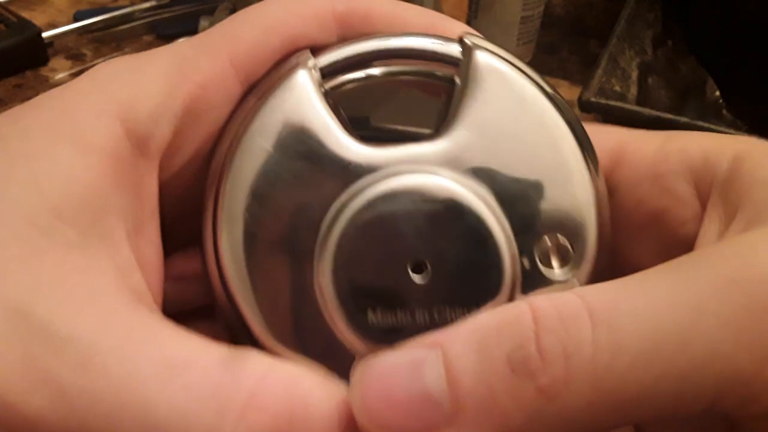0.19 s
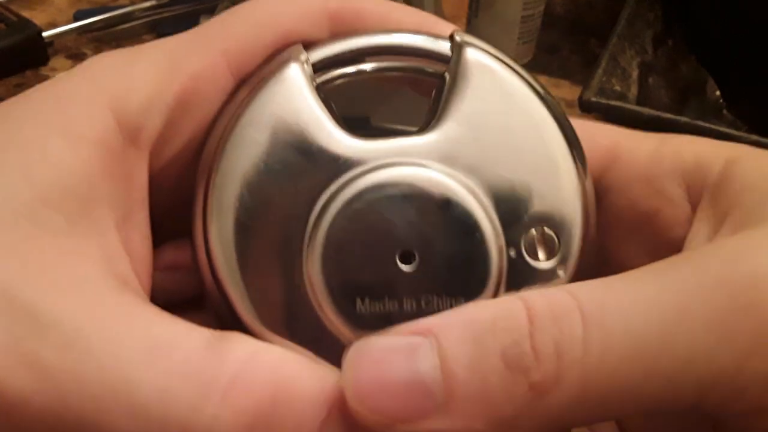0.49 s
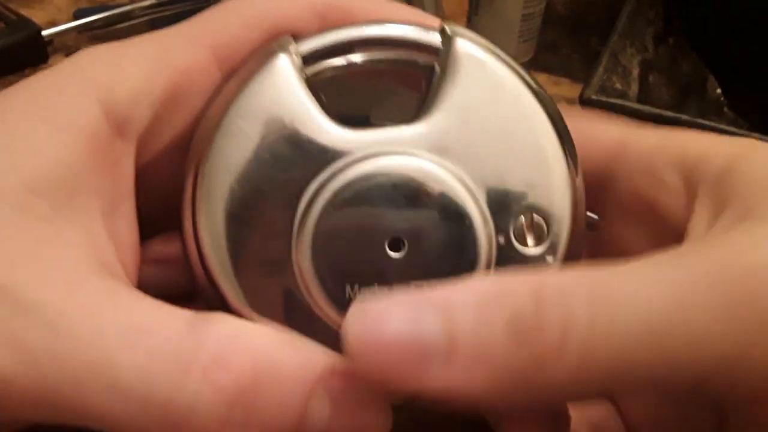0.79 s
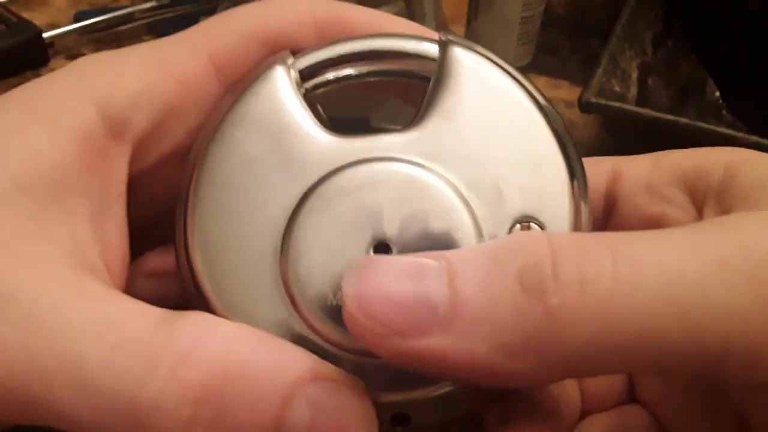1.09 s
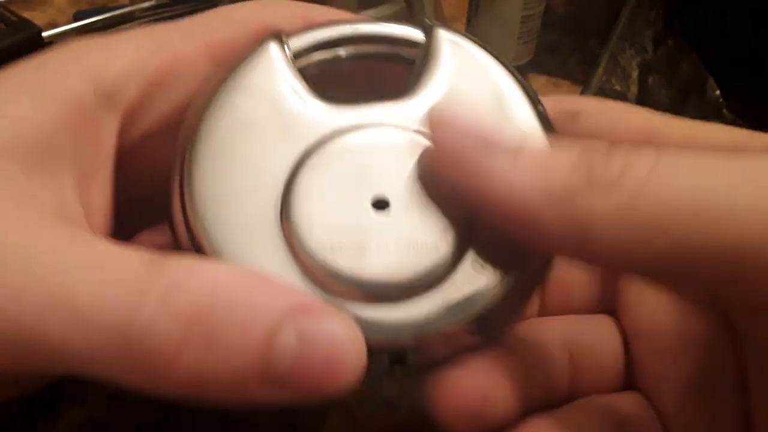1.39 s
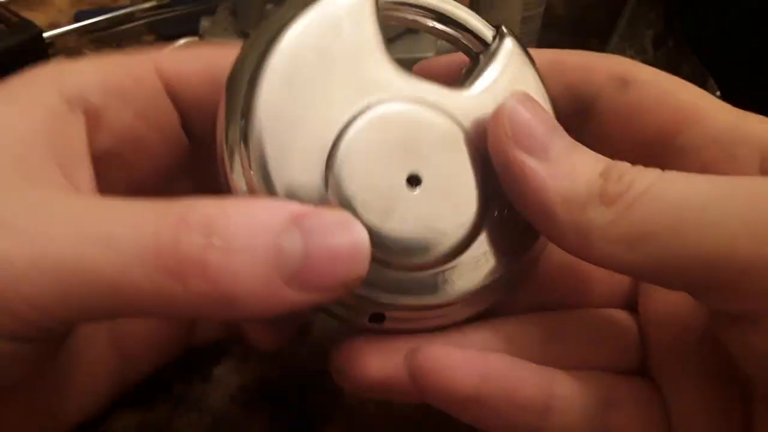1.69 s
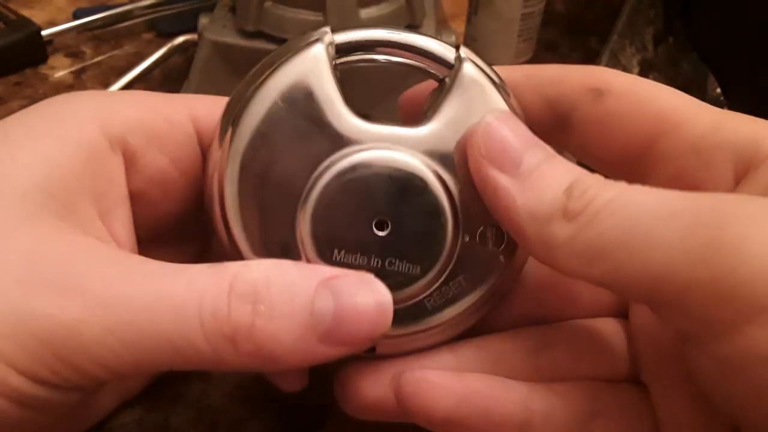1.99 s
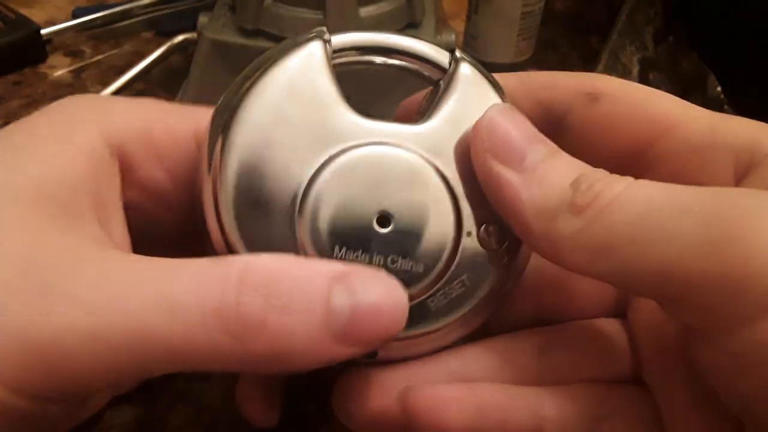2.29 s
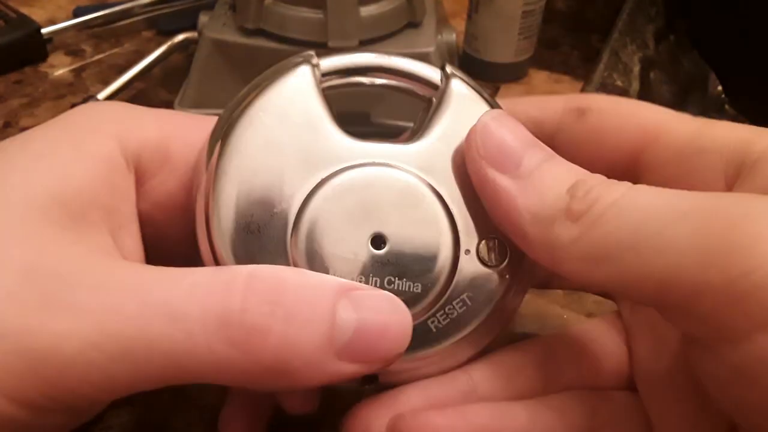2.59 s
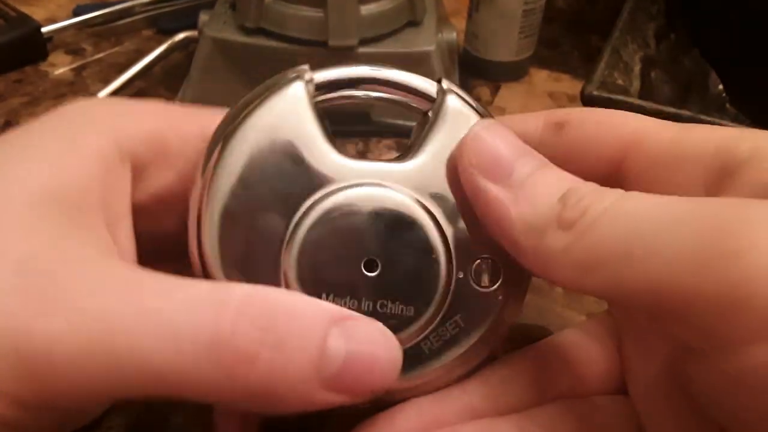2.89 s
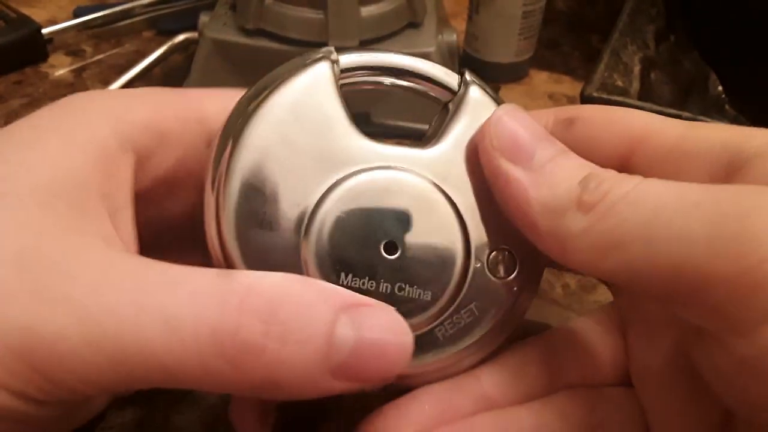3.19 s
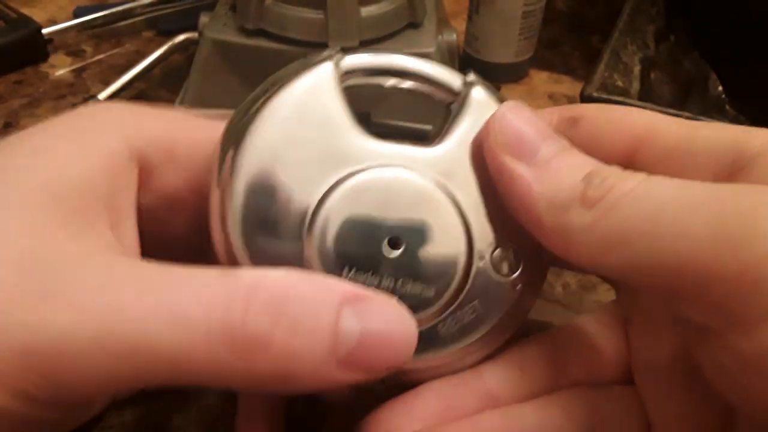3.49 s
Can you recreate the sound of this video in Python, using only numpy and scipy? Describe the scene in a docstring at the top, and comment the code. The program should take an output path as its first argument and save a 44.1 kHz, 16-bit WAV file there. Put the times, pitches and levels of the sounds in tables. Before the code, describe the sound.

Combination padlock dials clicking, very close: a quick uneven cluster of sharp metal ticks, a pause with one hard clack as the lock shifts, then denser, brighter clicking. Soft finger rubbing and faint hiss in a quiet room.

```python
"""Steel disc padlock in the hands.

Thumbs turn the small metal dials of a disc padlock, close to the microphone in a quiet room.
Clicks, scrapes and loose ticks are noise bursts and grains filtered by the hand-damped case; pings are
decaying sines, and the lock clacks once. Fingers slide, rub and bump: shaped noise. Hiss lies below.
The room answers the clicks, scrapes, ticks and clack with one bench reflection and a noise tail."""
import sys
import numpy as np
from scipy import signal
from scipy.fft import rfft, irfft
from scipy.io import wavfile

SR = 44100
rng = np.random.default_rng(int(sys.argv[2]) if len(sys.argv) > 2 else 0)


def pcm_store(signal):
    """Save signal as 16-bit PCM."""
    levels = np.round(np.clip(np.atleast_2d(signal), -1, 1) * 32767)
    wavfile.write(sys.argv[1], SR, levels.astype(np.int16).T)


N = 158760
HZ = np.fft.rfftfreq(4096, 1 / SR)
FFT_SIZE = 2 * (len(HZ) - 1)
REGRIP_S = 1.4  # clicks and scrapes use the second grip's case from here on
RISE_S = 0.000768  # onset of clicks, pings and clack

# Detent clicks: t/s, level before trim/dB, knock re level before trim/dB,
# bright edge re level before trim/dB, knock pitch/Hz, tick pitch/Hz
CLICKS = [(0.0662, -46.5, -5, -5, 1850, 4830), (0.094, -38.5, -12, 0, 2000, 6200),
          (0.1984, -40.5, -1.5, -16, 1830, 5830), (0.2098, -35.5, -19, -1.5, 2020, 4470),
          (0.2183, -53, 13, -10, 1900, 3340), (0.2504, -31, -16, -12, 1610, 6060),
          (0.2539, -30, -1, -9, 1790, 4970), (0.2563, -32.5, -34, -3.5, 1690, 5000),
          (0.2758, -31, -4, -27, 1790, 5050), (0.2796, -34.5, -0.5, -3, 1620, 6100),
          (0.4116, -33, -4, -11, 1880, 5900), (0.5253, -41, -4.5, -9, 1830, 6000),
          (0.5914, -39, -1.5, -12, 1770, 6000), (0.6175, -33, -20, 3, 1880, 6200),
          (0.6245, -25, -9, 4, 1140, 6150), (0.6292, -42, -24, 12, 1350, 5900),
          (0.6356, -31, -4, -11, 1780, 4500), (0.7008, -29.5, -6.5, -8.5, 1430, 6000),
          (0.7145, -53, 0, -10, 1780, 5940), (0.9519, -51, -4, -21, 1310, 3760),
          (0.9902, -45.5, -8, -19, 1770, 6100), (1.0034, -48, -14, -14, 1790, 4920),
          (1.0139, -29.5, -19.5, -2, 1500, 5960), (1.0252, -33, -11.5, -1.5, 2100, 6940),
          (1.0302, -36, -27, -10, 1750, 6000), (1.039, -35, -15, -5, 1170, 6400),
          (1.047, -38.5, -25, -2, 2040, 5260), (1.0594, -44, -13, -7, 2030, 5200),
          (1.193, -50, -10, -6, 2020, 5400), (1.215, -48.5, -25, -6.5, 2020, 5660),
          (1.5684, -53.5, -2.5, -14, 2020, 2760), (1.6328, -43, -4, -10, 1930, 3950),
          (1.9116, -44, -1, -11, 1840, 3600), (1.9153, -41.5, 4, -20, 2030, 3870),
          (1.9414, -51, 9.5, -6, 2020, 3340), (1.9517, -33, -6, -5.5, 1250, 6000),
          (1.9849, -45, -3, -7, 1270, 5300), (2.0512, -35, -11.5, -3.5, 1320, 5800),
          (2.106, -49, 7, -15, 1110, 5000), (2.118, -49, 0, 10, 1270, 6300),
          (2.1265, -36.5, -7, 6, 1280, 6700), (2.131, -33.5, -7, 3, 1180, 7060),
          (2.1366, -38, -5, 2, 1080, 6750), (2.1495, -34, -6.5, 1.5, 1310, 6500),
          (2.1532, -22, -8, -3.5, 1890, 6400), (2.2164, -33, -8.5, -9, 2200, 3600),
          (2.28, -37, -9.5, -27, 2110, 6200), (2.3007, -41, 3.5, -14, 2050, 4430),
          (2.3244, -48, 5, -20, 1050, 3820), (2.343, -35, 3.5, -11.5, 1290, 4120),
          (2.3502, -42, 9.5, -6.5, 1280, 3600), (2.424, -39, 0.5, -14, 1330, 4530),
          (2.4379, -47, 13.5, -13, 1780, 3560), (2.4443, -44, 2.5, -7, 1830, 4000),
          (2.5185, -31.5, -6, -1, 2250, 4270), (2.5245, -33, -5, 0.5, 1360, 6000),
          (2.5342, -28.5, -8.5, 5, 1290, 6500), (2.5415, -40, 4.5, -3, 980, 6160),
          (2.548, -42, -12, -5, 1200, 6200), (2.561, -39.5, -1.5, 1, 1100, 4400),
          (2.5748, -37.5, -6.5, -8, 2120, 3750), (2.5934, -44, -2, -16, 1300, 3720),
          (2.7036, -29, -10, -17.5, 1960, 6070), (2.7115, -38, -2, -13, 2050, 4530),
          (2.7571, -33.5, -6, -12, 2010, 4440), (2.886, -30, -16, -1, 2070, 4660),
          (2.91, -33.5, -1, 1.5, 1270, 6300), (2.934, -32, -14, -8, 1270, 4200),
          (2.9396, -36, -6, -4, 1290, 5400), (2.943, -33, -6, -3, 1290, 5600),
          (2.946, -26, -17, -1.5, 1290, 5300), (2.9653, -24, -6, -8.5, 1350, 5050),
          (3.1211, -35.5, 0, -15, 1940, 4400), (3.1437, -31.5, 5.5, -8.5, 1130, 4600),
          (3.1553, -27, -12, -4, 1870, 5400), (3.2318, -40.5, -10.5, -1, 2010, 4730),
          (3.2941, -37.5, -3.5, -7, 1260, 6740), (3.304, -41, -9, -8, 1340, 4600),
          (3.32, -42, 0, -4, 1140, 4700), (3.324, -33, -4.5, 6.5, 1140, 4430),
          (3.335, -34.5, 1, 2.5, 1820, 3920), (3.3372, -33.5, 0.5, 5.5, 1170, 3900),
          (3.4133, -50.5, 11, -11, 1260, 3040), (3.4437, -46.5, 2.5, -18, 990, 3160)]
# The two microphone ports: f/Hz, likeness/0-1, left lead/rad, left re right/dB
PORTS = [(100, 0.5, 0.093, 30), (790, 0.9, 0.46, -2.5), (1053, 1, 1.08, 0), (1385, 0.99, 1.83, 4.5),
         (1813, 0.97, 1.32, 2), (2090, 0.73, 2.8, -5.5), (2790, 0.47, 3.86, 2.5), (4330, 1, 4.32, -0.5),
         (5340, 0.02, 7.7, -0.5), (6480, 0.45, 7.73, 0), (7380, 0.98, 7.84, -3.5), (8930, 0, 5.4, 3),
         (12800, 0.34, 8.1, -3.5), (14500, 0.92, 1.85, -2)]


def amp(db):
    """Decibels to gain."""
    return 10 ** (np.asarray(db) / 20)


def unit(x):
    """Scales to rms 1."""
    return x / np.sqrt(np.mean(x ** 2) + 1e-20)


def read(table, hz, axis=1):
    """One column of a table, interpolated on a log-frequency axis."""
    table = np.array(table)
    return np.interp(np.log(hz + 1), np.log(table[:, 0]), table[:, axis])


def level(table):
    """Gain over the whole scene from rows of time and dB."""
    return amp(np.interp(np.arange(N) / SR, *np.transpose(table)))


def add(mix, s, sound):
    """Mixes a stereo sound in at time s."""
    part = mix[:, max(round(s * SR), 0):][:, :sound.shape[1]]
    part += sound[:, :part.shape[1]]


def causal(db):
    """Causal (minimum-phase) frequency response with this gain in dB."""
    log_gain = np.log(amp(db))
    mirrored = np.r_[log_gain, log_gain[-2:0:-1]]
    return np.exp(np.conj(signal.hilbert(mirrored)))[:len(HZ)]


def peak(hz, width):
    """Bell of height 1 around a resonance."""
    return 1 / (1 + (2 * (HZ - hz) / width) ** 2)


def ports(pair, size):
    """Spectra of two unrelated noises, made as alike as the two ports hear them."""
    hz = np.fft.rfftfreq(size, 1 / SR)
    a, b = rfft(pair, size)
    same = np.clip(read(PORTS, hz), 0, 1)
    side = amp(read(PORTS, hz, axis=3) / 2)
    lag = np.exp(-1j * read(PORTS, hz, axis=2))
    right = (same * a + np.sqrt(1 - same ** 2) * b) * lag
    return np.array([a * side, right / side])


def noise(colour):
    """Steady stereo noise of one colour at rms 1, partly alike at both ports in the bass."""
    hz = np.fft.rfftfreq(N, 1 / SR)
    a, b = rfft(rng.standard_normal((2, N)))
    same = np.clip(0.66 / (1 + (hz / 900) ** 2), 0, 1)
    right = same * a + np.sqrt(1 - same ** 2) * b
    return unit(irfft(np.array([a, right]) * amp(read(colour, hz)), N))


def slides():
    """Fingertip friction: noise in a narrow resonance that glides as the fingertip moves."""
    # start/s, length/s, from/Hz, to/Hz, level before fade window/dB
    slide_rows = [(-.02, 0.076, 309, 390, -62.5), (0, 0.087, 485, 582, -64.5),
                  (0.068, 0.078, 378, 414, -67.5), (0.357, .12, 184, 243, -66),
                  (0.455, .11, 255.7, 378, -64.5), (.61, .22, 169.7, 330, -68.5),
                  (1.53, 0.061, 168, 222, -68), (1.575, 0.049, 512, 580, -71)]
    width_hz = 49
    pole = np.exp(-np.pi * width_hz / SR)
    out = np.zeros((2, N))
    for s, length_s, from_hz, to_hz, db in slide_rows:
        size = int(length_s * SR)
        complex_noise = [1, 1j] @ rng.standard_normal((2, SR // 4))
        wobble = signal.lfilter([1], [1, -pole], complex_noise)
        wobble = signal.fftconvolve(wobble, np.hanning(200), "same")[-size:]
        cycles = np.cumsum(np.linspace(from_hz, to_hz, size)) / SR
        rub = (wobble * np.exp(2j * np.pi * cycles)).real
        rub = amp(db) * unit(rub) * np.hanning(size)
        # a slide starting before 0 s loses its head
        add(out, s, rub[None, max(-round(s * SR), 0):])
    return out


def skin():
    """Skin rubbing on steel: broad friction noise whose level follows the hands."""
    # f/Hz, relative density/dB
    colour = [(50, -23), (200, -4), (380, -5), (750, -15), (1300, 1.5), (1850, 4.5), (2600, -2), (5500, -4),
              (8000, -9), (15000, -12)]
    # t/s, level/dB
    rub_level = [(0, -48.5), (.08, -56), (.16, -68.5), (.3, -57.5), (.42, -54.5), (.55, -56.5), (.7, -56.5),
                 (.88, -71.5), (1.0, -67), (1.25, -82), (1.48, -83), (1.59, -67.5), (1.8, -64),
                 (2.3, -65.5), (2.8, -62), (3.3, -60), (3.6, -69)]
    return noise(colour) * level(rub_level)


def palms():
    """Palms shifting on the case: dull low noise of slowly changing level."""
    # f/Hz, relative density/dB
    colour = [(40, -13), (200, 1.5), (420, -3), (2000, -52)]
    # t/s, level/dB
    palm_level = [(.3, -79), (.42, -69), (.75, -72), (1.4, -85), (1.57, -78), (1.7, -95)]
    return noise(colour) * level(palm_level)


def air():
    """Still air and microphone hiss: steady coloured noise."""
    # f/Hz, relative density/dB
    colour = [(15, -59), (25, -28), (97, -2), (301, -13.5), (516, -19.5), (659, -17.5), (988, -13.5),
              (2690, -16.5), (2910, -14), (6380, -5.5), (11000, -12), (16000, -22)]
    level_db = -61
    return amp(level_db) * noise(colour)


def case_response(second_grip):
    """Case in one grip: broad colour plus hand-damped modes, randomly retuned by the dial's position."""
    # broad colour: f/Hz, gain/dB
    colour = [(60, -43), (200, -37), (550, -30.5), (720, -18), (950, -5), (2400, -2), (4000, 2),
              (6700, -1.5), (7700, -7.5), (11000, -12), (15500, -10.5), (16300, -21)]
    # modes before detuning: f/Hz, width/Hz, lift in first grip/dB, lift in second grip/dB
    modes = [(1050, 800, -1, 2.5), (1314, 250, 10.5, 7.5), (1786, 166, 10.5, 3.5), (2000, 190, 8, 2.5),
             (2980, 160, -5.5, 4), (3230, 350, 5.5, 1), (3780, 21, 4, 7.5), (4810, 250, 4, 6),
             (5850, 800, 3, 7.5), (6480, 360, 3, 3), (8800, 220, -2, 3), (9380, 270, 8.5, 6.5),
             (10700, 300, 0, 4), (11550, 240, 9, 9), (12450, 560, 10, 8), (14000, 450, -3, -6)]
    detune = .012  # standard deviation, share of pitch
    shifts = 1 + detune * rng.standard_normal(len(modes))
    gain_db = read(colour, HZ)
    for shift, (hz, width, first_db, second_db) in zip(shifts, modes):
        lift_db = second_db if second_grip else first_db
        gain_db = gain_db + lift_db * peak(hz * shift, width)
    return causal(gain_db)


def band_split():
    """Causal filters splitting a click's power into knock, middle and bright edge."""
    knock_edge_hz, bright_edge_hz = 2400, 7500
    low = 1 / (1 + (HZ / knock_edge_hz) ** 12)
    high = 1 - 1 / (1 + (HZ / bright_edge_hz) ** 10)
    shares = (low, (1 - low) * (1 - high), high)
    return [causal(10 * np.log10(share + 1e-8)) for share in shares]


def click(case, bands, level_db, knock_db, edge_db, knock_hz, tick_hz):
    """A detent snaps home and chatters for a few milliseconds, favouring two modes of the case."""
    level_trim_db, knock_trim_db, edge_trim_db = -0.5, -0.28, -0.1
    lift_db, knock_width_hz, tick_width_hz = 8.5, 270, 560
    knock_s, rattle_s, fall_shape, snap = 0.0028, 0.0037, 1.13, 1.66
    t = np.arange(FFT_SIZE // 4) / SR
    chatter = rng.standard_normal((2, len(t)))
    chatter[:, round(RISE_S * SR)] += snap * rng.choice([-1, 1], 2)
    favoured = peak(knock_hz, knock_width_hz) + peak(tick_hz, tick_width_hz)
    body = case * causal(lift_db * favoured)
    levels_db = (knock_db + knock_trim_db, 0, edge_db + edge_trim_db)
    out = 0
    for band, db, decay_s in zip(bands, levels_db, (knock_s, rattle_s, rattle_s)):
        burst = chatter * np.minimum(t / RISE_S, 1) * np.exp(-(t / decay_s) ** fall_shape)
        # 20 samples of lead-in leave room for inter-port phase
        part = irfft(ports(np.roll(burst, 20, 1), FFT_SIZE) * body * band)
        # level is rms as if the energy filled 220 samples (5 ms)
        out = out + amp(db) * unit(part) * np.sqrt(220 / FFT_SIZE)
    return amp(level_db + level_trim_db) * out


def clicks():
    """Detent clicks, each through a freshly retuned case in the grip of the moment."""
    out, bands = np.zeros((2, N)), band_split()
    for s, *settings in CLICKS:
        case = case_response(s > REGRIP_S)
        add(out, s - 20 / SR, click(case, bands, *settings))  # minus the lead-in
    return out


def grains(case, size, grains_per_s):
    """Tiny random catches of metal on metal, sounding through the case, at rms 1."""
    spread_db = 2
    train = rng.random(size) < grains_per_s / SR
    strength = amp(spread_db * np.minimum(rng.exponential(1, size), 4))
    hits = train * strength * rng.standard_normal((2, size))
    pair = irfft(ports(hits, 2 * size))[:, :size]
    return unit(signal.fftconvolve(pair, irfft(case)[None], axes=1)[:, :size])


def loose_ticks(case):
    """Loose dials tick slightly under the thumb: sparse grains, gated to the time around clicks."""
    ticks_per_s, level_db, reach_s = 70, -66, 0.044
    t = np.arange(N) / SR
    near = sum(np.exp(-((t - row[0]) / reach_s) ** 2) for row in CLICKS)
    return amp(level_db) * np.minimum(near, 1) * grains(case, N, ticks_per_s)


def pings():
    """A dial or its spring rings briefly: one decaying mode, phase-lagged at the right port."""
    # t/s, f/Hz, level/dB
    ping_rows = [(.0951, 12450, -39), (.2565, 11750, -39), (0.2779, 1660, -31.5), (.4132, 5080, -40),
                 (.619, 1980, -32), (1.049, 9200, -35.5), (1.953, 4920, -35.5), (2.1545, 4910, -21),
                 (2.1548, 3830, -27), (2.155, 2730, -16.5), (2.344, 1710, -28), (2.5355, 12500, -27),
                 (2.7046, 2040, -40), (2.9108, 1270, -28.5), (2.9665, 4890, -33), (3.1225, 2100, -31),
                 (3.1445, 9200, -34), (3.1566, 4650, -23.5), (3.1568, 5180, -21), (3.2335, 11400, -38.5),
                 (3.3365, 12570, -17)]
    decay_s = 0.0039
    out, t = np.zeros((2, N)), np.arange(SR // 10) / SR
    envelope = np.minimum(t / RISE_S, 1) * np.exp(-t / decay_s)
    for s, hz, db in ping_rows:
        lag = np.array([[0], [read(PORTS, hz, axis=2)]])
        phase = 2 * np.pi * (hz * t + rng.random()) - lag
        add(out, s, amp(db) * envelope * np.sin(phase))
    return out


def scrapes(cases):
    """A dial scrapes up to its next notch: dense fine catches through the case."""
    # start/s, length/s, level before fades/dB
    scrape_rows = [(0.243, 0.02, -40), (.269, 0.015, -33), (0.581, 0.016, -45.5), (.614, 0.023, -32),
                   (1.019, 0.041, -45.5), (2.13, 0.02, -38), (2.508, 0.022, -41), (2.542, 0.024, -39.5),
                   (2.888, .06, -38.5), (2.937, 0.015, -32.5), (3.32, 0.03, -35)]
    grains_per_s = 1800
    out = np.zeros((2, N))
    for s, length_s, db in scrape_rows:
        scrape = grains(cases[int(s > REGRIP_S)], len(HZ), grains_per_s)
        scrape = scrape[:, :int(length_s * SR)]
        add(out, s, amp(db) * scrape * signal.windows.tukey(scrape.shape[1]))
    return out


def dials():
    """Clicks, scrapes and loose ticking; scrapes use one case per grip, ticks the second grip's throughout."""
    cases = [case_response(False), case_response(True)]
    return clicks() + loose_ticks(cases[1]) + scrapes(cases)


def bumps():
    """Hands bump the case softly: low noise under a short swell and decay."""
    # onset/s, envelope peak/dB
    bump_rows = [(0.266, -68.5), (.5, -67), (0.624, -60.5), (1.023, -64), (1.549, -76), (1.942, -61.5),
                 (2.903, -61.5), (2.939, -57), (3.226, -66)]
    peak_s, corner_hz = 0.0093, 235
    t, push = np.arange(N) / SR, 0
    for s, db in bump_rows:
        age = np.maximum(t - s, 0) / peak_s
        push = push + amp(db) * age * np.exp(1 - age)
    # f/Hz, relative density/dB
    return push * noise([(30, -20), (110, 0), (corner_hz, -1), (600, -15), (3000, -50)])


def clack():
    """One hard, broad knock of the whole shifting lock: a snap and a short rattle."""
    # f/Hz, gain/dB
    colour_rows = [(300, -39), (580, -30.5), (850, -6.5), (1800, 4), (2800, -1.5), (3600, 2.5),
                   (4300, -7.5), (8400, -21), (9200, -10), (10500, -27), (13000, -11.5), (14500, -23)]
    start_s, level_db, decay_s, snap = 1.6855, -23, 0.0033, 6
    out, t = np.zeros((2, N)), np.arange(FFT_SIZE) / SR
    envelope = np.minimum(t / RISE_S, 1) * np.exp(-t / decay_s)
    burst = rng.standard_normal((2, FFT_SIZE)) * envelope
    burst[:, round(RISE_S * SR)] += snap
    colour = causal(read(colour_rows, HZ))
    colour = colour / np.sqrt(np.mean(abs(colour) ** 2))
    knock = irfft(ports(burst, FFT_SIZE) * colour)[:, :FFT_SIZE // 2]
    add(out, start_s, amp(level_db) * knock)
    return out


def room(x):
    """One near reflection off the bench, then a noise tail that dies at its own speed in each band."""
    # f/Hz, t60/s, relative level/dB
    room_rows = [(202, 0.39, 3.5), (1250, 0.42, -12), (2290, 0.37, -14.5), (3430, 0.45, -11),
                 (5460, 0.7, -13.5), (8800, 0.34, -11.5), (12600, 0.51, -11.5), (15000, 0.31, -12.5)]
    bench_s, bench_db, onset_s = .0125, -17, 0.0023
    hz, t, z = signal.stft(rng.standard_normal((2, SR // 2)), SR, nperseg=256)
    fade = amp(-60 * t / read(room_rows, hz)[:, None])
    fade *= np.minimum(t / onset_s, 1)
    # equal energy in every band, then the band levels
    energy = (fade ** 2).sum(1, keepdims=True) * t[1] * SR
    fade *= amp(read(room_rows, hz, axis=2))[:, None] / np.sqrt(energy)
    tail = signal.istft(z * fade, SR, nperseg=256)[1]
    tail[:, round(bench_s * SR)] += amp(bench_db)
    return signal.fftconvolve(x, tail, axes=1)[:, :N]


def scene():
    """The lock in the hands, in its room."""
    clack_room_db = 1.5  # extra clack share into the room
    lock, knock = dials(), clack()
    near = slides() + skin() + palms() + lock + pings() + bumps() + knock
    return near + room(lock + amp(clack_room_db) * knock) + air()


def record(dry):
    """Band limit: a linear-phase low-pass."""
    cut_hz = 15950
    low_pass = signal.firwin(255, cut_hz, window=("kaiser", 8), fs=SR)
    return signal.oaconvolve(dry, low_pass[None], "same")


dry = scene()
out = record(dry)
pcm_store(out)
```